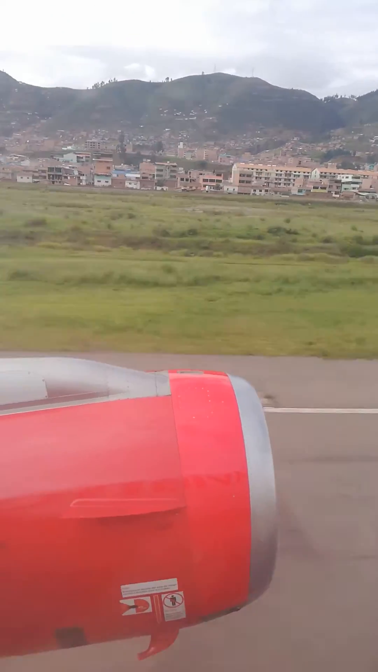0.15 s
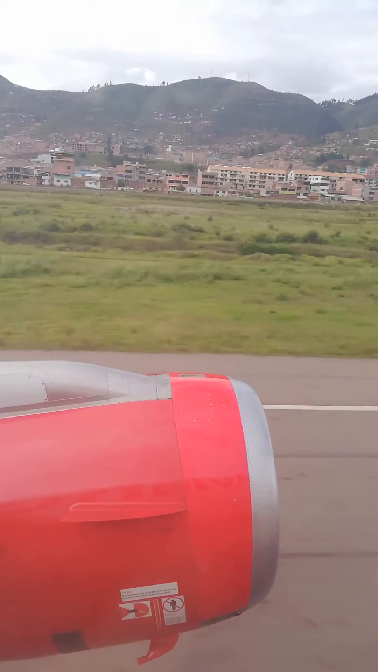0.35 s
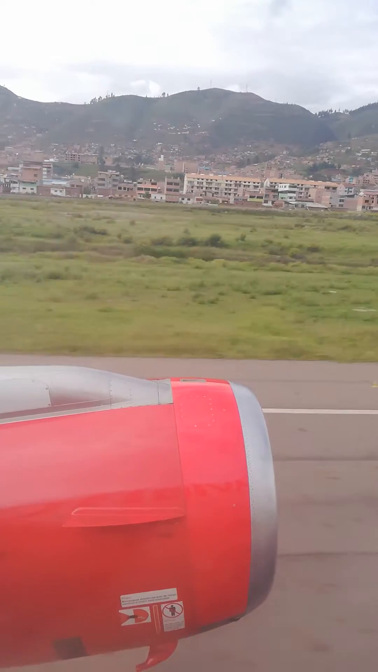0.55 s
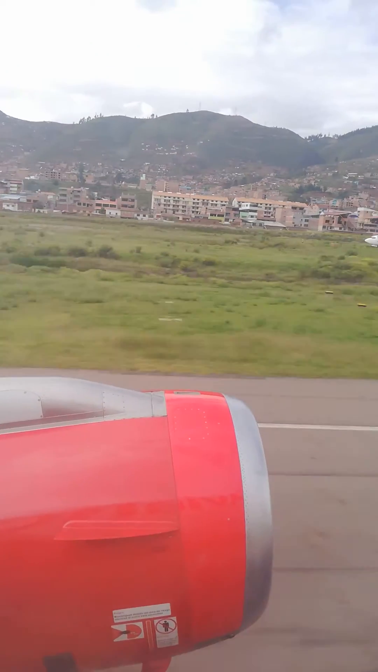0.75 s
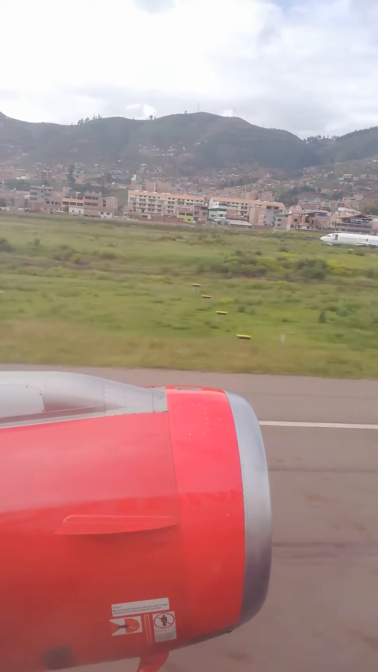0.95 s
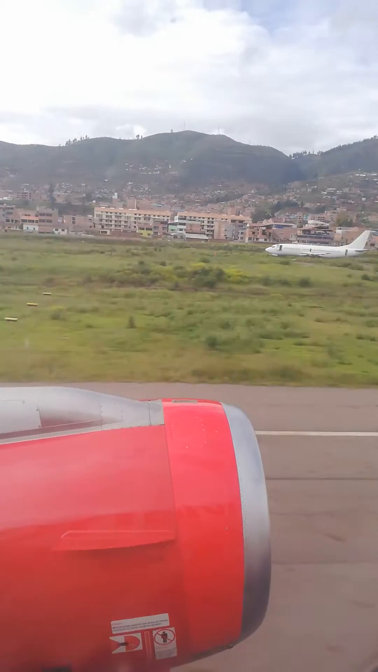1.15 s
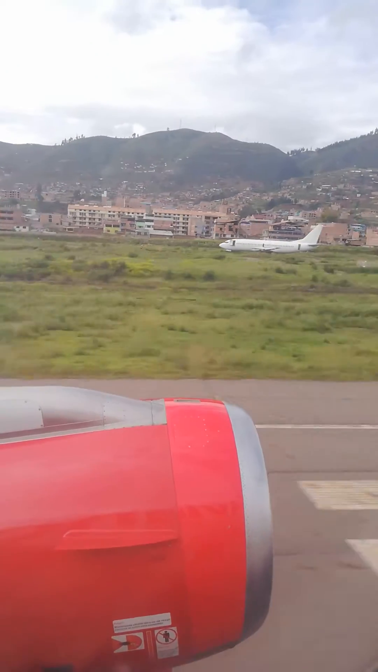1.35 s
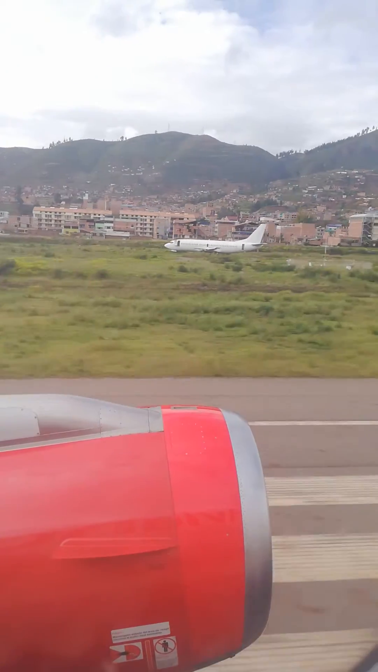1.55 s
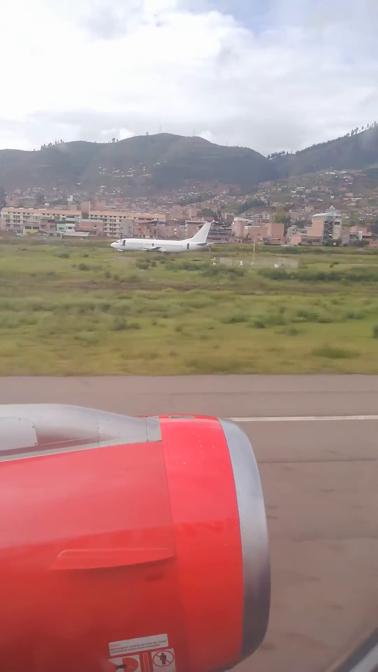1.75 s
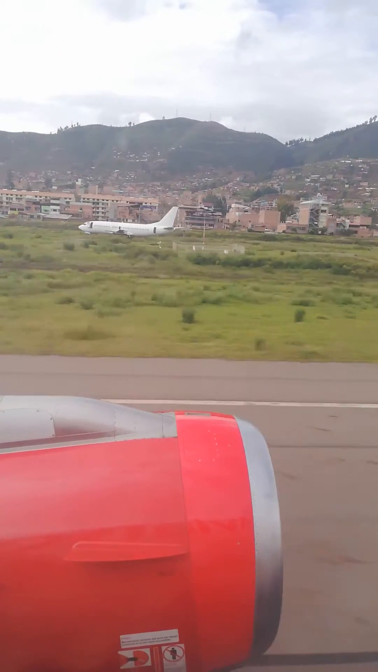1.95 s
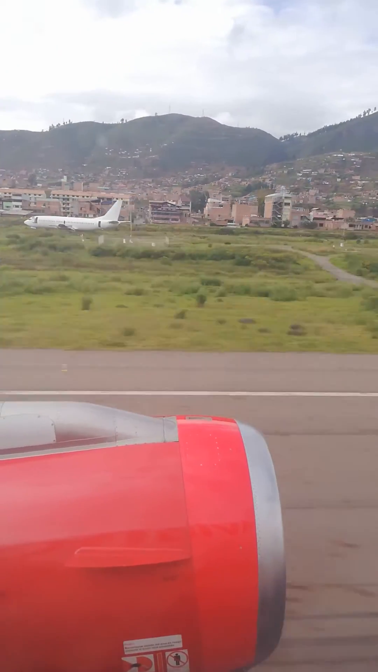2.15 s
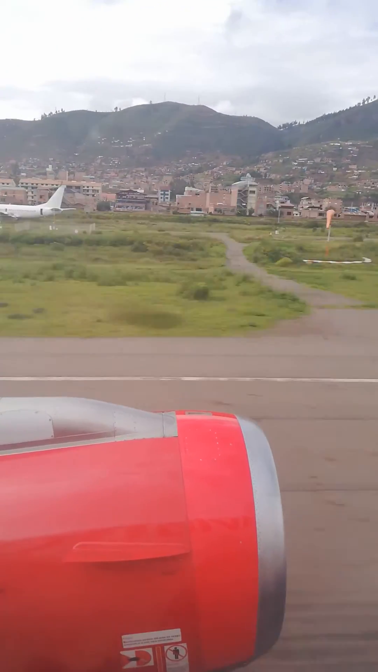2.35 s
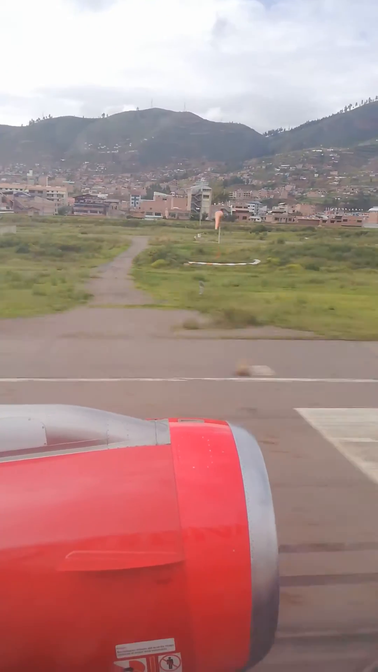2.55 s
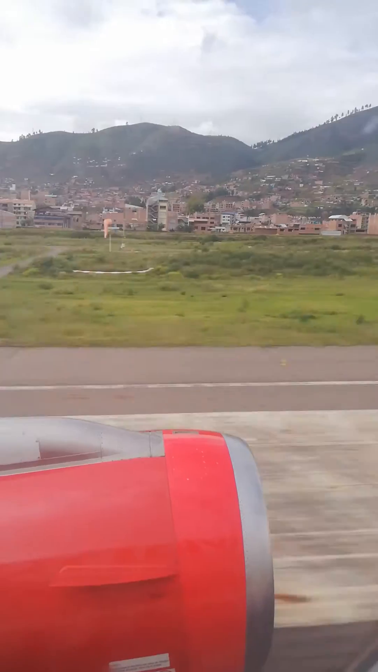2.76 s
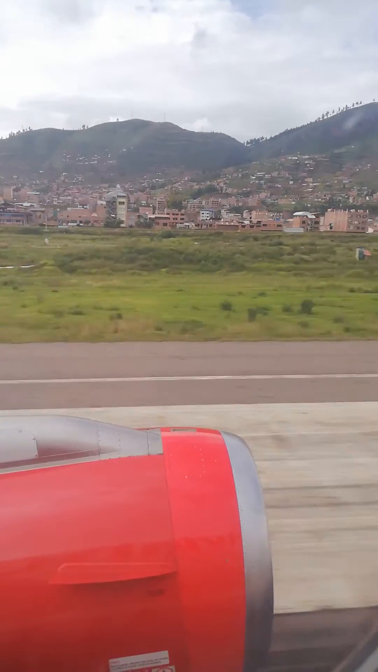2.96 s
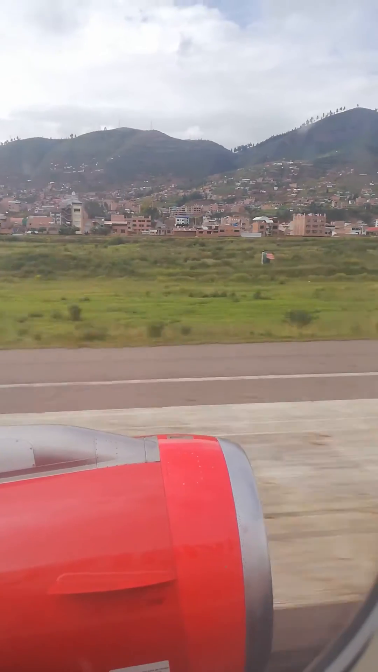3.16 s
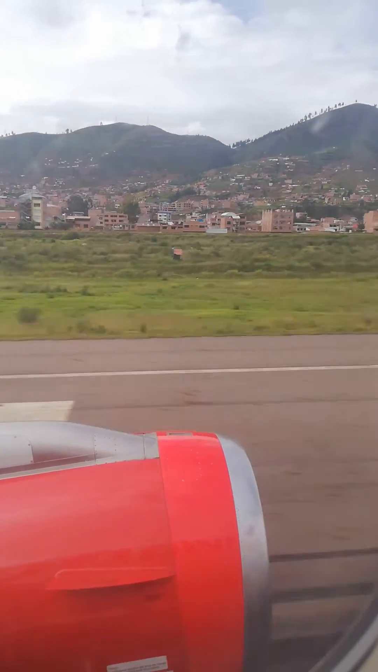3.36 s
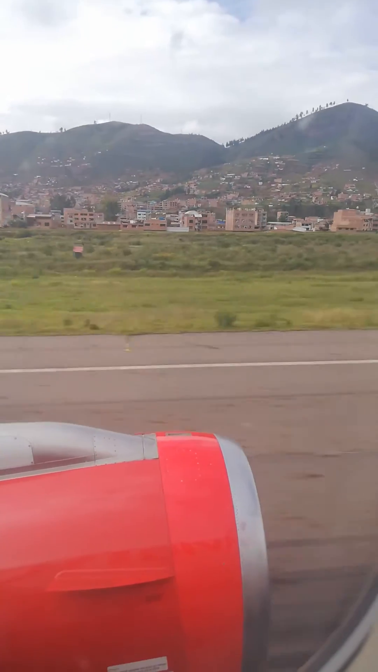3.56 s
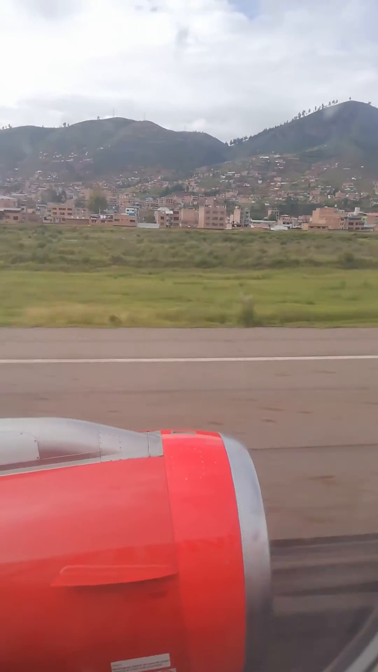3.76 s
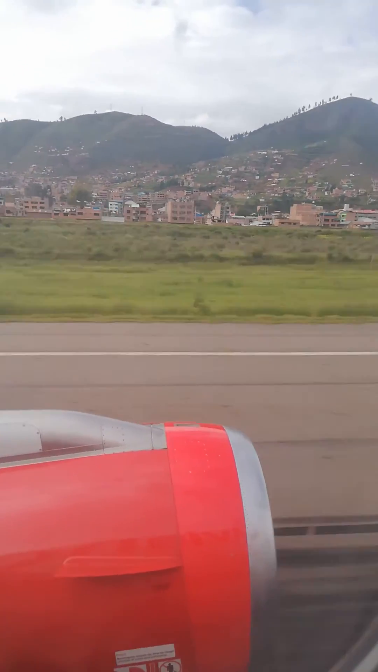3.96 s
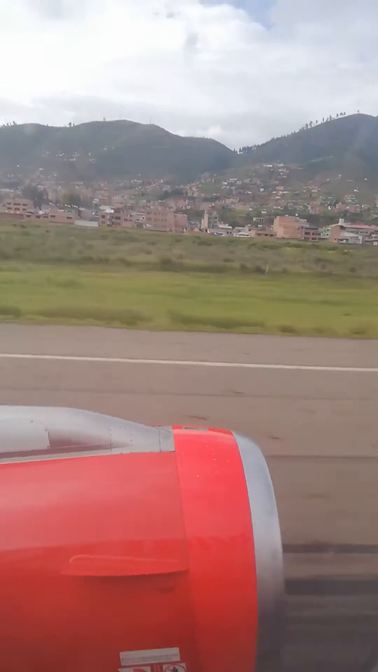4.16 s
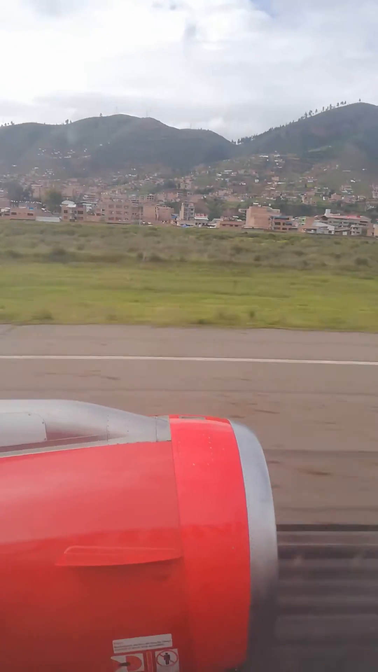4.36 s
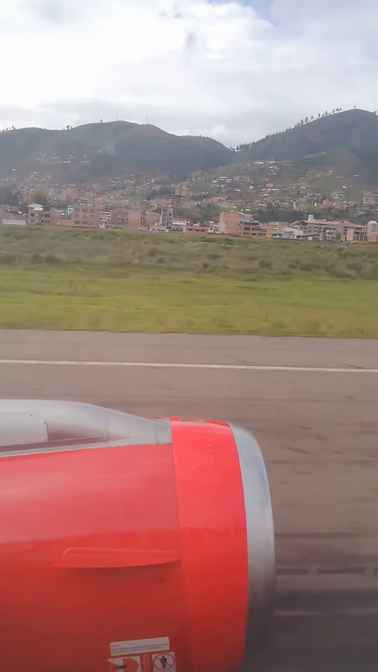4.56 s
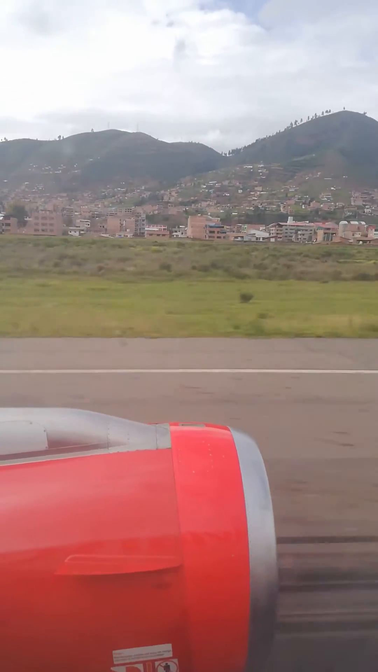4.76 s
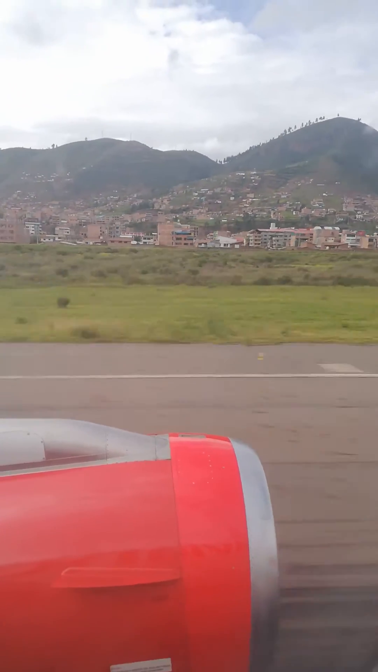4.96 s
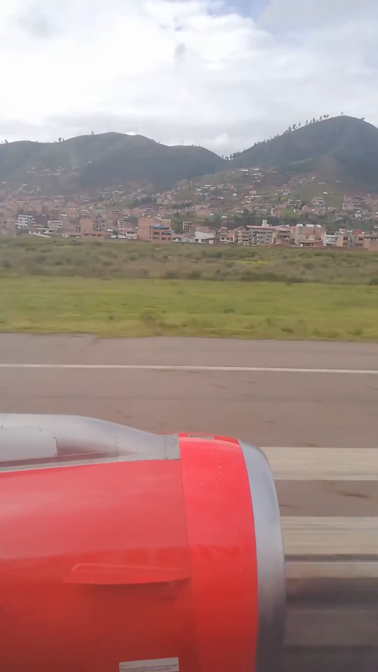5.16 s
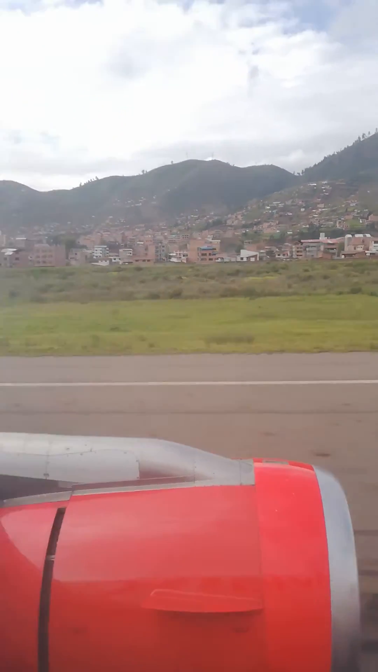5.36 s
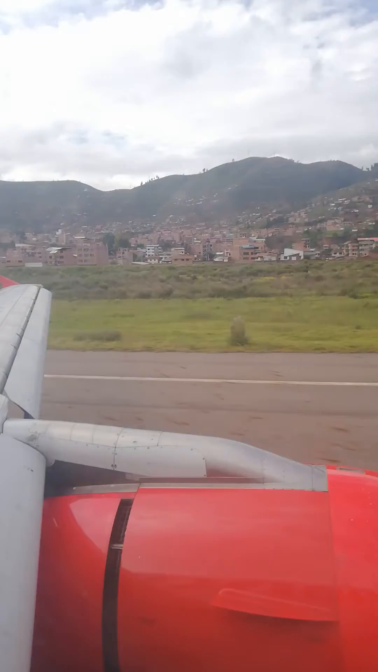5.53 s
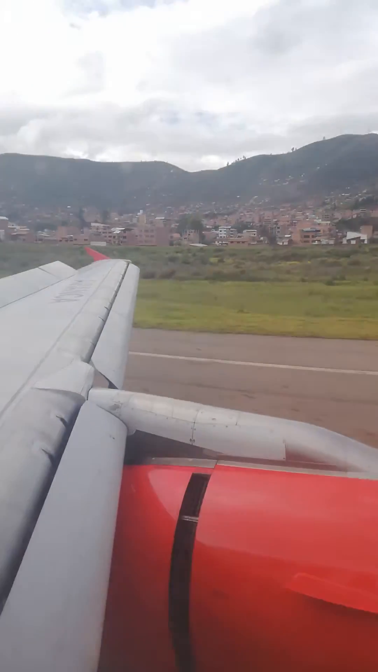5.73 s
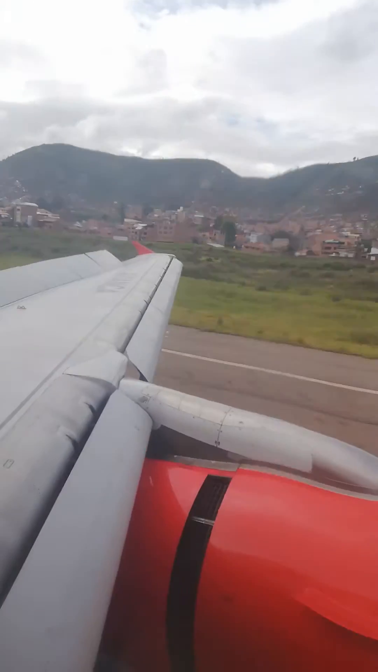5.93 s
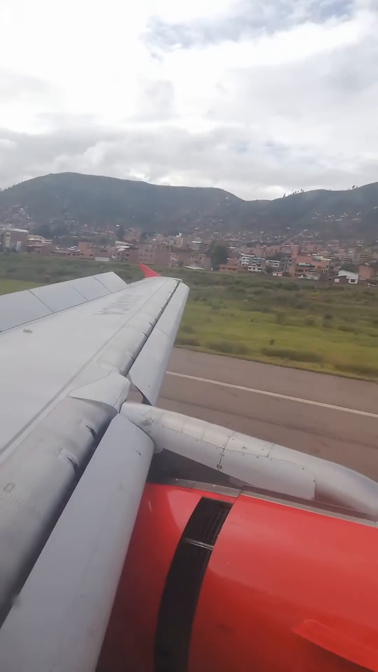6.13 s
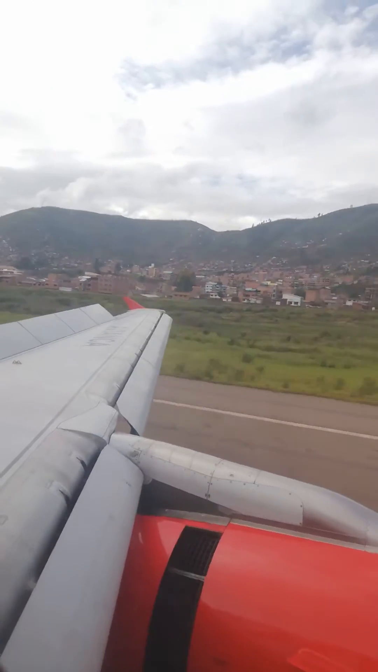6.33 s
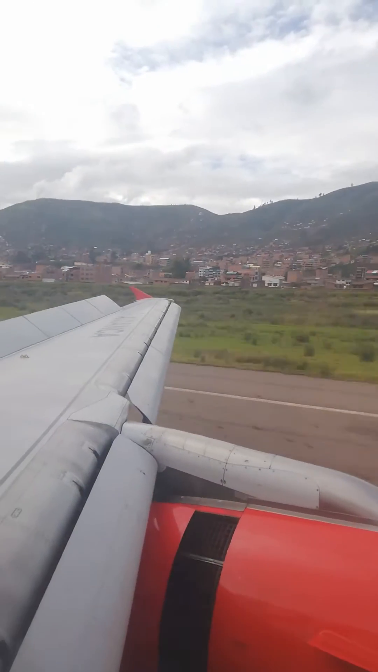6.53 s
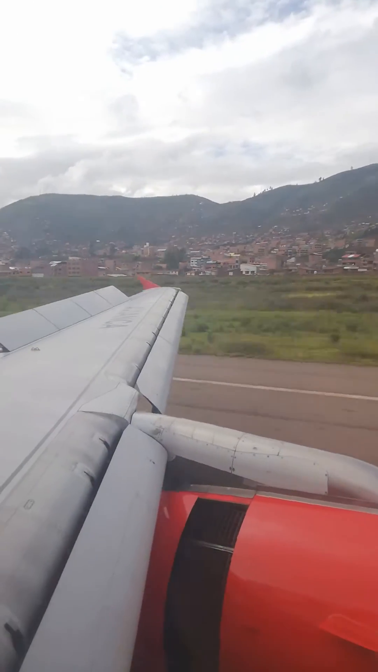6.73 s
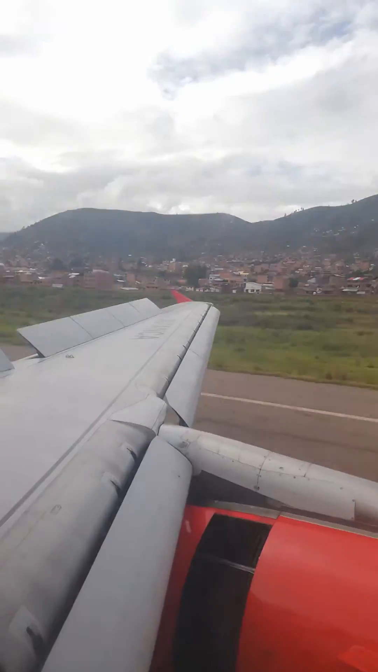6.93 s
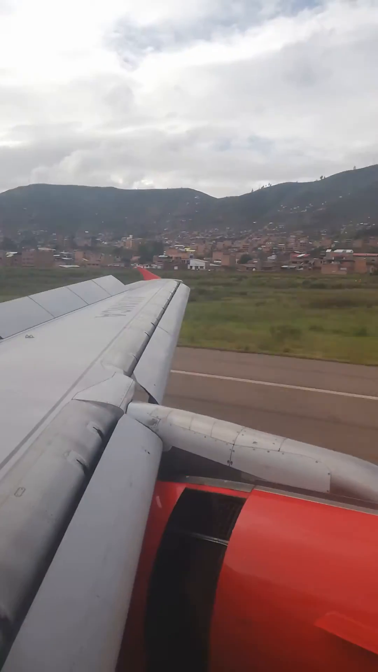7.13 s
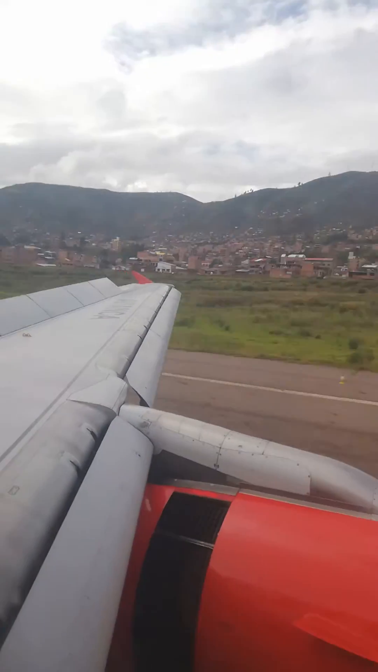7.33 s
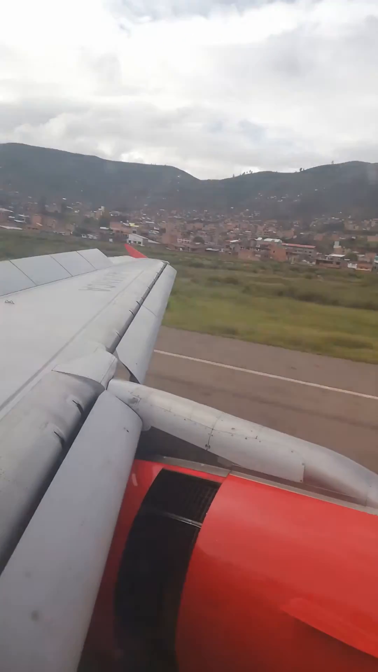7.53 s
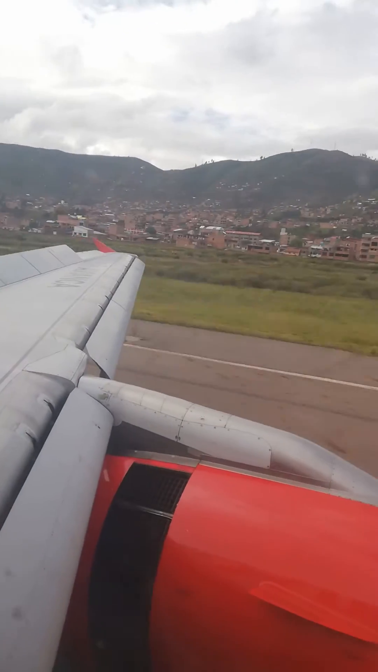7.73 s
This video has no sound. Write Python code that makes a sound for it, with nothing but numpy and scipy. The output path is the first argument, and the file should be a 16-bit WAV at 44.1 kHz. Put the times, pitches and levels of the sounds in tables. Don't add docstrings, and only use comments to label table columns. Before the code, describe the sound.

Close to an airliner window, slipstream and vents hiss over a low idling engine rumble with soft bumps. A tiny rubber squeak comes just before the wheels hit with deep thumps. Panels tick and buzz as the runway jolts the fuselage, the phone knocks sharply on the pane, and reverse thrust swells to a thick roar through the end.

```python
import sys
import numpy as np
from scipy import signal
from scipy.fft import rfft, irfft, next_fast_len
from scipy.io import wavfile
from scipy.ndimage import uniform_filter1d

SR = 44100
rng = np.random.default_rng(int(sys.argv[2]) if len(sys.argv) > 2 else 0)


def wav_out(sig):
    wavfile.write(sys.argv[1], SR, np.round(np.clip(np.atleast_2d(sig).T, -1, 1) * 32767).astype(np.int16))


def elevation(decibels):
    levels = np.asarray(decibels, float)
    return 10 ** (levels / 20)


N = 347949


def rms_one(x):
    return x / np.sqrt(np.mean(x ** 2) + 1e-20)


def in_time(rows):
    s, *columns = np.transpose(rows)
    return [np.interp(np.arange(N) / SR, s, c) for c in columns]


def at_hz(rows, hz):
    known, *columns = np.transpose(rows)
    return [np.interp(np.log(hz), np.log(known), c) for c in columns]


def drift(rate):
    r = np.exp(-80 * np.pi * rate / SR)
    white = rng.standard_normal(N // 40 + 2002)
    slow = signal.lfilter([1], [1, -2 * r, r * r], white)[2000:]
    return np.interp(np.arange(N) / 40, np.arange(len(slow)), rms_one(slow))


def ring(x, hz, t60):
    r = elevation(-60 / (max(t60, 5e-4) * SR))
    w = 2 * np.pi * hz / SR
    return signal.lfilter([0, np.sin(w)], [1, -2 * r * np.cos(w), r * r], x + 1e-18)


# f/Hz, likeness in phase [-1..1], likeness a quarter turn apart [-1..1],
# left minus right level/dB
PORT_LIKENESS = [(60, .996, .04, 0), (110, .99, .04, 0), (150, .96, .15, 0), (260, .88, .33, -.3),
                 (400, .68, .15, -1.5), (460, -.05, -.2, .5), (570, -.72, -.05, 2.5), (800, -.42, -.1, 3.0),
                 (1050, -.1, -.35, 3.0), (1300, .33, -.3, -.5), (1650, .2, -.05, -1.5),
                 (1950, -.3, .35, -6.0), (2350, .1, .05, 1.5), (2800, -.35, -.2, .1), (3600, .02, -.05, .3),
                 (6000, .01, .01, 1.5), (9800, .01, .01, 4.5), (12500, .01, .01, -1.5)]


def cabin_field(spectrum):
    size = next_fast_len(N)
    hz = np.maximum(np.arange(size // 2 + 1) * SR / size, 1)
    inside = (hz > spectrum[0][0] / 1.3) & (hz < spectrum[-1][0] * 1.15)
    in_phase, quarter, balance_db = at_hz(PORT_LIKENESS, hz)
    alike = in_phase + 1j * quarter
    alike = alike / np.maximum(abs(alike), 1)
    left, own = rfft(rng.standard_normal((2, size)))
    right = alike * left + np.sqrt(np.maximum(1 - abs(alike) ** 2, 0)) * own
    a, b = elevation(balance_db / 2), elevation(-balance_db / 2)
    mean_gain = np.sqrt(a * a + b * b + 2 * alike.real)
    colour = inside * elevation(at_hz(spectrum, hz)[0]) / mean_gain
    both = irfft(colour * np.array([a * left, b * right]), size)[:, :N]
    return both / both.mean(axis=0).std()


# t/s, level/dB
STREAM_LEVEL = [(0, -43.5), (.46, -41.5), (.83, -43.5), (1.95, -43), (2.35, -42.5), (3.58, -43),
                (3.73, -48.5), (4.46, -46.5), (4.62, -42.5), (4.78, -43.5), (4.95, -45), (5.72, -47),
                (5.95, -43.5), (6.09, -42.5), (6.19, -48.5), (6.45, -47.5), (7.58, -46), (7.89, -47.5)]


def ducking():
    db, = in_time(STREAM_LEVEL)
    return db - db.mean()


# f/Hz, level/dB per Hz
SLIPSTREAM_COLOUR = [(250, -25), (430, 2.5), (499, 1.5), (571, -7.5), (839, -6.5), (988, -4.5),
                     (1070, -7.5), (1150, -6), (1340, -8.5), (1520, -7.5), (1660, -11.5), (2070, -9),
                     (2350, -19.5), (3060, -44), (5170, -120)]
# f/Hz, level/dB per Hz
BRIGHT_EDGE_COLOUR = [(1380, -7), (2350, 0), (3200, 0), (4040, -2.5), (4490, -9.5), (4800, -7), (6240, -17),
                      (10600, -120)]
# f/Hz, level/dB per Hz
VENT_COLOUR = [(2590, 1.5), (4400, -2), (4490, -10), (6660, -4), (8410, -2), (9150, 1), (10800, 0),
               (13600, -11.5), (15100, -19), (15600, -22)]
# t/s, level/dB
VENT_LEVEL = [(0, -57), (.42, -55), (.8, -59), (1.5, -55), (3.3, -54), (4.6, -53.5), (5.5, -54),
              (6.3, -56.5), (7.0, -52.5), (7.89, -59.5)]


def breathy_ridge(hz, t60):
    turbulence = rng.standard_normal((2, N))
    return rms_one(ring(ring(turbulence, hz, t60), hz, t60))


def air():
    (stream_db,), (vent_db,), gain_db = in_time(STREAM_LEVEL), in_time(VENT_LEVEL), ducking()
    gusts = drift(3.8)
    stream_db = stream_db + 1.0 + 1.5 * gusts + 0.32 * drift(44)
    stream = elevation(stream_db) * cabin_field(SLIPSTREAM_COLOUR)
    edge_db = -53.5 + 1.1 * gain_db + 0.5 * gusts + 1.17 * drift(33)
    edge = elevation(edge_db) * cabin_field(BRIGHT_EDGE_COLOUR)
    duct = elevation(-56.5 + 0.51 * gain_db + [[-4.0], [4.0]]) * breathy_ridge(2112, 0.015)
    grille = elevation(-65 + gain_db) * breathy_ridge(4200, 0.0045)
    vent_db = vent_db + 0.92 * gain_db + 1.0 * gusts + 1.1 * drift(25)
    vent = elevation(vent_db) * cabin_field(VENT_COLOUR)
    return stream + edge + duct + grille + vent


def jolts(rows):
    rise_s, fall_s = 0.02, 0.035
    t, power = np.arange(N) / SR, np.zeros(N)
    for s, db in rows:
        power += elevation(2 * db) * np.exp(-((t - s) / np.where(t < s, rise_s, fall_s)) ** 2)
    return power


def evened(field):
    power = field.mean(axis=0) ** 2
    beating = uniform_filter1d(uniform_filter1d(power, size=2600), size=2600)
    return rms_one(field / (beating + 0.05) ** 0.23)


# f/Hz, level/dB per Hz
BOOM_COLOUR = [(12, -66), (20, 3.5), (30, -13), (45, 3), (55, 3.5), (64, -7), (72, 2.5), (85, -20)]
# f/Hz, level/dB per Hz
RUMBLE_COLOUR = [(55, -21), (66, -10), (74, -1), (87, 4), (100, -3), (118, -5), (140, -21), (180, -25.5),
                 (230, -51.5)]
# f/Hz, level/dB per Hz
ROAR_COLOUR = [(85, -22), (105, -2), (125, 0), (150, -1.5), (180, -5.5), (210, -2.5), (250, -9),
               (300, -12.5), (350, -19), (392, -16.5), (425, -25.5), (520, -36), (750, -39), (1100, -47)]
# t/s, share [0-1]
WHEEL_LOAD = [
    (0, 0.39),
    (3.655, 0.18),
    (3.675, 1),
    (4.15, 0.46),
    (4.45, 0.97),
    (4.6, 0.42),
    (4.85, 0.63),
    (5.1, 0.85),
    (7.89, 0.88),
]
# t/s, level/dB over idle
REVERSE_THRUST = [
    (0, 0.5),
    (4.7, 0),
    (5.3, 4),
    (6.08, 3.5),
    (6.22, 11.5),
    (6.45, 9),
    (7.0, 10),
    (7.35, 10),
    (7.89, 12),
]
# t/s, level/dB
FLIGHT_SWELLS = [
    (.09, -20),
    (.42, -19),
    (.72, -28),
    (1.3, -18),
    (1.6, -34),
    (2.68, -20),
]
# t/s, level/dB
FUSELAGE_THUMPS = [
    (3.685, -13),
    (4.21, -9),
                   (3.728, -13), (3.84, -11), (3.922, -20), (4.05, -6.5), (4.29, -6), (4.429, -18),
                  (4.994, -11.5), (5.179, -13.5), (5.628, -9), (6.006, -22), (6.263, -28), (6.416, -13.5),
                  (6.567, -27), (6.734, -7.5), (6.876, -7), (7.106, -25), (7.81, -16)]
# t/s, level/dB
RUNWAY_FLOOR_JOLTS = [(3.677, -11), (3.978, -11), (4.078, -19), (5.357, -17), (5.659, -14), (5.889, -17),
                      (6.327, -18), (6.499, -9), (6.62, -14), (6.768, -14.5), (7.095, -11), (7.233, -15.5),
                      (7.324, -9), (7.463, -19), (7.728, -7)]


def engines():
    (load,), (thrust_db,), t = in_time(WHEEL_LOAD), in_time(REVERSE_THRUST), np.arange(N) / SR
    flight_boom = elevation(2 * (-19 - 1.8 * t))
    rolling_boom = (load * elevation(-14)) ** 2
    boom_power = flight_boom + rolling_boom + jolts(FLIGHT_SWELLS + FUSELAGE_THUMPS)
    rolling_rumble = (load * elevation(-21 + 0.53 * thrust_db)) ** 2
    rumble_power = elevation(2 * -25.5) + rolling_rumble + jolts(RUNWAY_FLOOR_JOLTS)
    boom = np.sqrt(boom_power) * evened(cabin_field(BOOM_COLOUR))
    rumble = np.sqrt(rumble_power) * evened(cabin_field(RUMBLE_COLOUR))
    roar = elevation(-24.5 + thrust_db + 0.89 * ducking()) * cabin_field(ROAR_COLOUR)
    return boom + rumble + roar


# t/s, f/Hz, peak level/dB
SEAL_SLIPS = [
    (3.225, 5380, -44),
    (3.27, 3640, -45),
    (3.313, 3470, -38.5),
    (3.324, 3500, -37),
    (3.343, 3400, -37.5),
    (3.363, 3730, -37),
    (3.384, 3730, -43),
]


def squeak():
    t, chirps = np.arange(N) / SR, np.zeros(N)
    for s, hz, db in SEAL_SLIPS:
        swell = np.exp(-((t - s - 0.003) / 0.0079) ** 2)
        chirps += elevation(db) * swell * np.sin(2 * np.pi * hz * t)
    return chirps * (0.2 + 0.5 * drift(260))


# f/Hz, level/dB, t60/s
LOW_MODES = [(2550, -2.5, 0.015), (3100, -3, 0.018)]
# f/Hz, level/dB, t60/s
HIGH_MODES = [(4170, -8, 0.005), (5300, 1, 0.0026), (6500, -6.5, 0.0056), (7600, -3, 0.0035),
              (8900, -1, 0.0043), (10000, 2.5, 0.0033), (12400, -31, 0.0016)]
# t/s, contacts per s and mode, low against high mode level/dB
BUZZ_CONTACTS = [
    (0, 4.4, -9),
    (3.6, 5.5, -2),
    (3.7, 55, 5),
    (4.5, 30, 2),
    (6.3, 13, -4),
    (6.7, 87, -2),
    (7.3, 60, 1),
    (7.65, 240, 2),
    (7.89, 80, -3),
]


def buzz():
    per_s, low_db = in_time(BUZZ_CONTACTS)
    per_s = per_s * elevation(3.9 * drift(13))
    out = np.zeros((2, N))
    grit = rng.standard_normal((2, N)) * elevation([[1.5], [-1.5]])
    for k, (hz, db, t60) in enumerate(LOW_MODES + HIGH_MODES[1:6]):
        touch = rng.random(N) < per_s / SR
        size_db = 2.8 * np.minimum(rng.exponential(1, N), 3)
        mode_db = db - 32.0 + low_db * (k < 2)
        puffs = uniform_filter1d(touch * elevation(size_db), size=45) * elevation(mode_db)
        out += ring(puffs * grit, hz, t60)
    return out


# t/s, peak level/dB, low against high mode level/dB, t60/s
PANEL_KNOCKS = [(0.5771, -42, -7, 0.072), (0.6724, -37, -2, 0.037), (0.9123, -36, -10, 0.028),
                (1.57, -35, -16, 0.046), (1.6556, -40, -5, 0.16), (2.2285, -44, -10, 0.45),
                (3.717, -38, -4, 0.035), (3.7798, -35.5, -18, 0.032), (4.0307, -39, -12, 0.056),
                (4.1784, -38, -13, 0.041), (4.1994, -42, -3, 0.066), (4.351, -32, -11, 0.026),
                (4.57, -36.5, -6, 0.16), (4.65, -36.5, -9, 0.71), (4.8803, -29.5, -17, 0.1),
                (4.906, -32, -17, 0.053), (5.1801, -42, -19, 0.063), (5.4228, -32, -12, 0.22),
                (5.733, -28.5, -19, 0.043), (5.8925, -35, -14, 0.034), (5.91, -34, -6, 0.021),
                (6.339, -36.5, -12, 0.15), (6.6687, -34, -20, 0.029), (6.763, -33, -10, 0.031),
                (6.8628, -35.5, -3, 0.029), (7.016, -33, -13, 0.08), (7.1077, -43, -13, 0.23),
                (7.226, -30, -13, 0.032), (7.4879, -38, -10, 0.044), (7.7333, -35, -7, 0.031)]
# t/s, peak level/dB, low against high mode level/dB
TRIM_TICKS = [(4.5274, -37, -6), (6.6174, -37.5, -16), (6.8319, -34, -10), (6.8912, -40, -11),
              (6.9551, -41, -13), (7.0783, -37, -10), (7.3602, -41, -11), (7.5288, -44, -12),
              (7.5547, -40, -6), (7.6455, -43, -6), (7.7097, -39, -2), (7.867, -39, -13)]


def panels():
    length, tick_t60_s = 4000, 0.045
    out, age = np.zeros((2, N + length)), np.arange(length) / SR
    knocks = PANEL_KNOCKS + [(*tick, tick_t60_s) for tick in TRIM_TICKS]
    grits = rng.standard_normal((len(knocks), 2, length))
    chances = rng.standard_normal((len(knocks), 2, 9))
    for (s, peak_db, low_db, t60), grit, (strength, detune) in zip(knocks, grits, chances):
        pan_db = 2 + 1.5 * strength[-1]
        low_hz = 2940 * (1 + 0.08 * detune[-1])
        t60 = np.clip(t60, 0.012, 0.3)
        rise = np.minimum(age / (0.025 * t60), 1)
        snap = 1 + 0.69 * np.exp(-age / 0.0037)
        fade = np.minimum((age[-1] - age) / 0.03, 1)
        decay = elevation(peak_db + 5.5 - 60 * age / t60)
        burst = grit * rise * snap * fade * decay * elevation([[pan_db / 2], [-pan_db / 2]])
        knock = elevation(low_db - 12) * ring(burst, low_hz, 0.0045)
        for k, (hz, db, mode_t60) in enumerate(HIGH_MODES):
            mode_gain = elevation(db - 29 + 0.57 * strength[k])
            knock = knock + mode_gain * ring(burst, hz * (1 + 0.079 * detune[k]), mode_t60)
        start = int(s * SR)
        out[:, start:start + length] += knock
    return out[:, :N]


# t/s, thud peak level/dB, tick peak level/dB, far port below near level/dB
PHONE_TAPS = [
    (0.2200, -12.5, -28, 11),
    (5.8033, -7, -5, 6),
    (5.9352, -8, -16, 8),
]
# f/Hz, t60/s
TICK_MODES = [(7600, .0011), (11000, .0008)]


def taps():
    thud, knock, port_lag_s = (900, 0.0042), (1600, 0.002), 0.00065
    s, thud_db, tick_db, far_db = np.transpose(PHONE_TAPS)
    near_push, edge_hits, far_push = np.zeros((3, N))
    near_push[(s * SR).astype(int)] = elevation(thud_db + 5.0)
    for late_s, db in [(0.0002, 0), (0.0021, -22), (0.0026, -24)]:
        edge_hits[((s + late_s) * SR).astype(int)] = elevation(tick_db + db)
    far_push[((s + port_lag_s) * SR).astype(int)] = elevation(thud_db - far_db)
    near, far = signal.lfilter(np.hanning(20) / 9.5, 1, np.array([near_push, far_push]))
    edge = np.diff(edge_hits, prepend=0)
    tick = ring(edge, *TICK_MODES[0]) - 0.5 * ring(edge, *TICK_MODES[1])
    near_port = ring(near, *thud) + 0.85 * ring(near, *knock) + tick
    far_port = ring(far, *thud) + 0.04 * tick
    return np.array([near_port, far_port])


def scene():
    return air() - engines() + squeak() + buzz() + panels() + taps()


def top_cut(x):
    return signal.sosfilt(signal.butter(12, 15800, fs=SR, output="sos"), x)


def record(dry):
    swell = uniform_filter1d(dry, size=130, axis=1)
    limited = dry / (1 + (swell / 0.78) ** 4) ** 0.25
    hz = np.arange(N // 2 + 1) * SR / N
    cut = irfft(rfft(np.clip(limited, -1, 1)) * (hz < 15800), N)
    fade_out = np.minimum(np.arange(N)[::-1] / SR / 0.003, 1)
    return top_cut(cut * fade_out)


dry = scene()
out = record(dry)
wav_out(out)
```